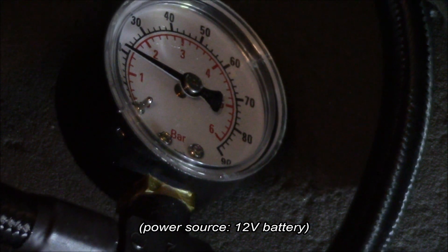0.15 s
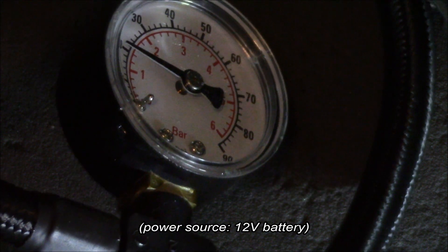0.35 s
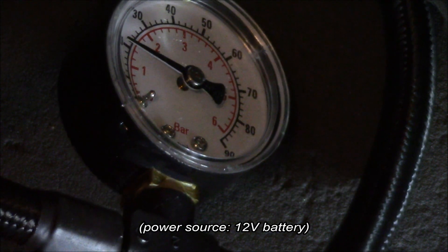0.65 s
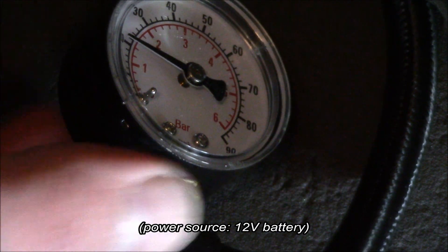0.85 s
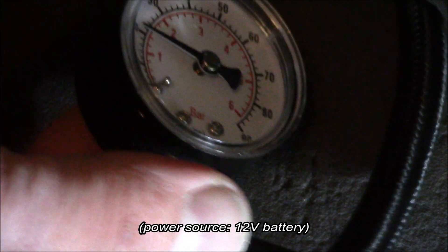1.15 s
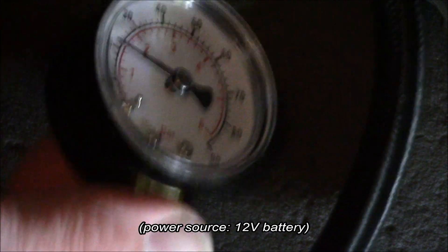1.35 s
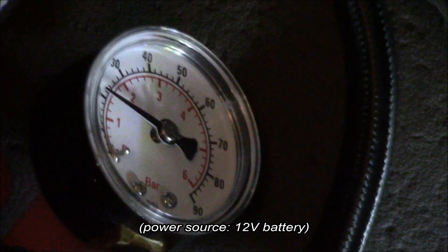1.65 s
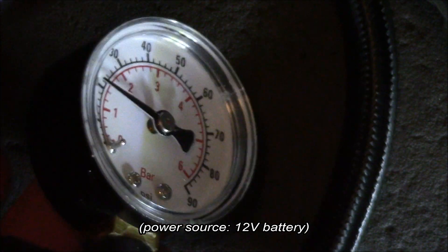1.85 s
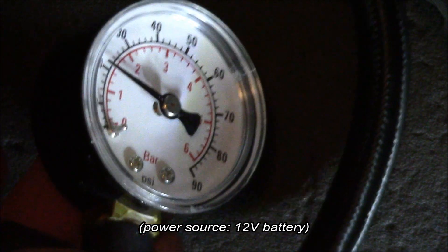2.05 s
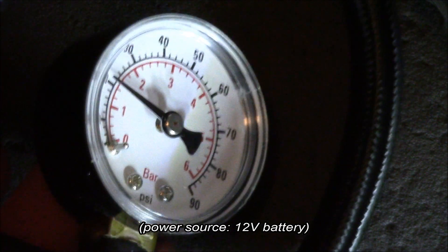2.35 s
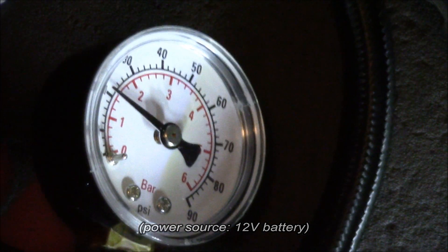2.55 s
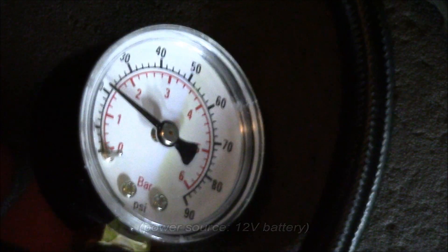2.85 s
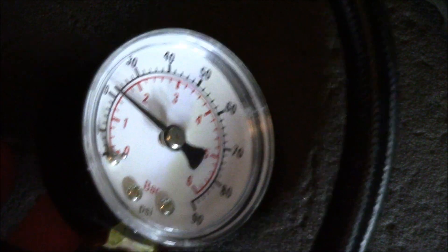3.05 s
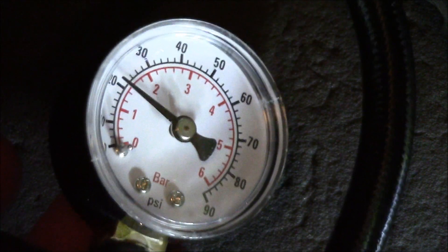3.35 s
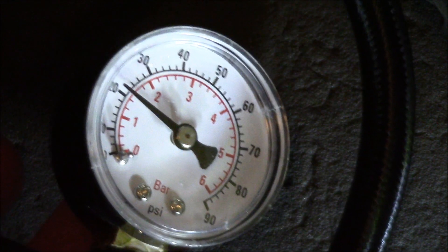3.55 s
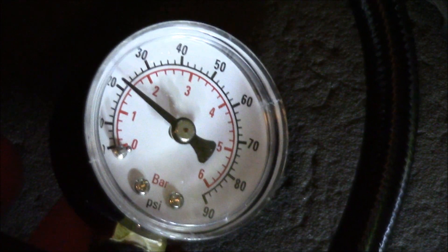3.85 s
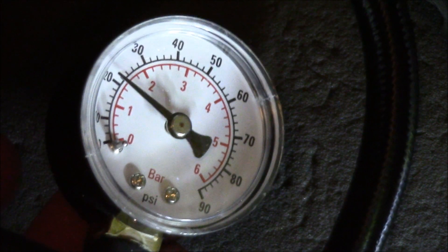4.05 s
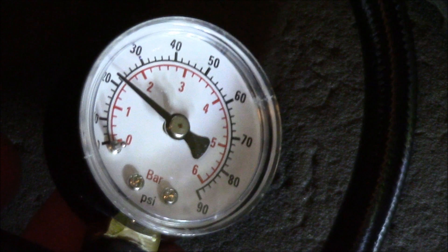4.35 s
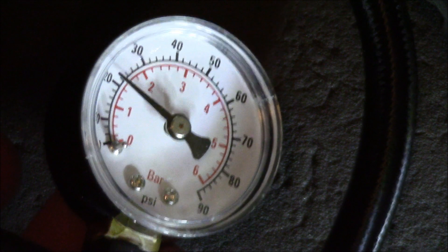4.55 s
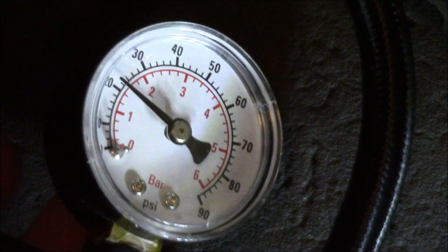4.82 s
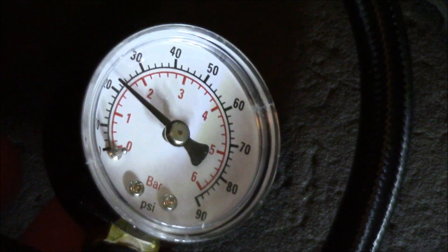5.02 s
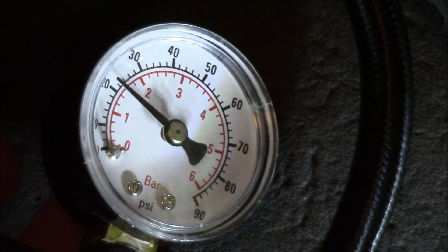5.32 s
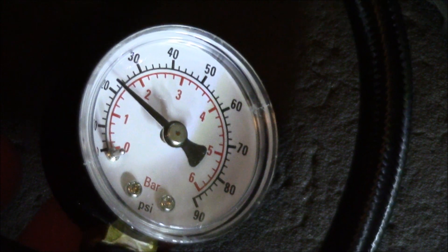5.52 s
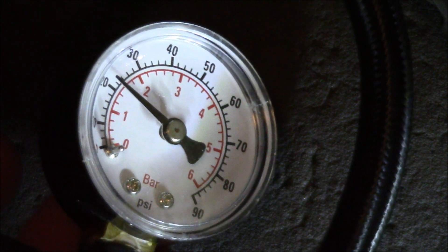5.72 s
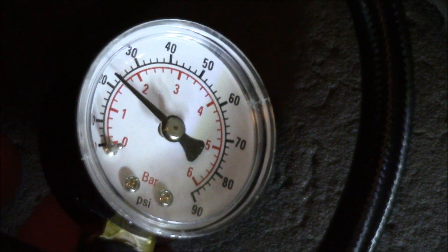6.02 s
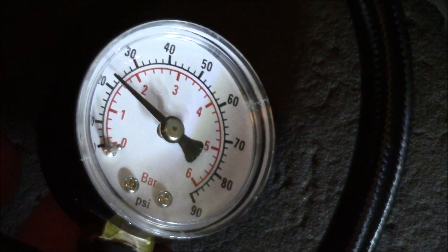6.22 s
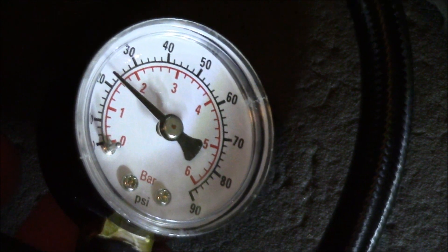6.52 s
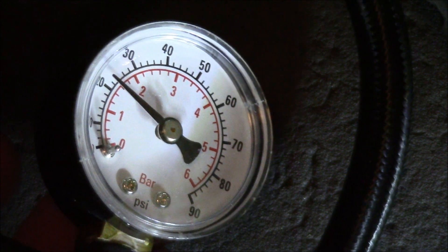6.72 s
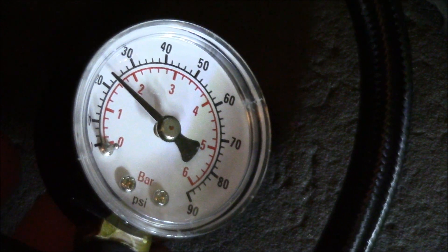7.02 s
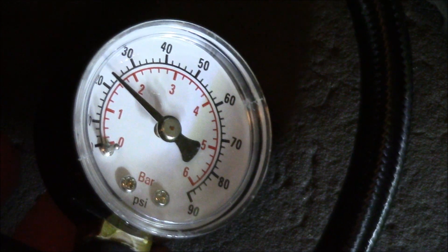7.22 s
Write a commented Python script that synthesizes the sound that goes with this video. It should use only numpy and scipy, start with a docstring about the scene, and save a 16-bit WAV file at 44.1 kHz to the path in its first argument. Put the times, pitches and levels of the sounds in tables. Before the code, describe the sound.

A small electric tyre compressor is already running very close to the microphone in a garage. Its rapid slapping buzz carries hard housing knocks, rattling, pulsing air hiss and a high gear whine. It rocks loosely at first, then settles firmer and more even about halfway through. The pitch sags only slightly as pressure builds. The sound is dry, nearly mono, and continues to the end.

```python
"""A rapid, slapping buzz with knocks, hiss and gear whine: a small geared tyre compressor close by in a garage.
It slows a little as the pressure builds. Each crank turn slaps and knocks the housing (partials and struck modes)
and puffs air past the valve (gated noise); gear teeth whine through shell modes, and the motor's own turn
beats against the crank. The housing rocks loosely, then settles on the floor. The sound is nearly mono."""
import sys
import numpy as np
from scipy import signal
from scipy.fft import rfft, irfft, next_fast_len
from scipy.io import wavfile
from scipy.ndimage import uniform_filter1d

SR = 44100
rng = np.random.default_rng(int(sys.argv[2]) if len(sys.argv) > 2 else 0)


def dump(signal):
    """Clip the signal to [-1, 1] and save it as 16-bit WAV at the path in sys.argv[1]."""
    limited = np.clip(np.atleast_2d(signal).T, -1, 1)
    pcm = np.round(limited * 32767).astype(np.int16)
    wavfile.write(sys.argv[1], SR, pcm)


N = 325458  # samples
GEAR, PINION = 52, 11  # teeth on the crank gear and on the motor's pinion


def undb(db):
    """Decibel law: the amplitude gain of a dB value."""
    return 10 ** (np.asarray(db) / 20)


def level(x, db):
    """Mean-square energy: scales a signal to an rms level in dB re 1."""
    return x * undb(db) / np.sqrt(np.mean(x ** 2))


def curve(table, column):
    """Linear interpolation: a table column at every sample, with time in the first column."""
    rows = np.array(table, float)
    return np.interp(np.arange(N) / SR, rows[:, 0], rows[:, column])


def change(at_s, time_s):
    """Logistic transition: a smooth step from 0 to 1 about a moment."""
    return .5 + .5 * np.tanh((np.arange(N) / SR - at_s) / (2 * time_s))


def walk(rate):
    """Slow random modulation: levels held for 1 / rate s and slewed twice, with a spread near 1."""
    hold = int(SR / rate)
    steps = np.repeat(rng.standard_normal(N // hold + 1), hold)
    return 1.16 * uniform_filter1d(uniform_filter1d(steps, hold), hold)[:N]


def colour(x, points, peaks=()):
    """Spectral shaping: filters by (Hz, dB) points, adding the power of (Hz, width Hz, dB) resonances."""
    size = next_fast_len(N)
    hz = np.maximum(np.arange(size // 2 + 1) * SR / size, 1)
    rows = np.array(points, float)
    power = undb(2 * np.interp(np.log(hz), np.log(rows[:, 0]), rows[:, 1], left=-90))
    for centre_hz, width_hz, db in peaks:
        power = power + undb(2 * db) / (1 + (2 * (hz - centre_hz) / width_hz) ** 2) ** 2
    return irfft(rfft(x, size) * np.sqrt(power), size)[:N]


def ring(x, hz, width_hz):
    """Damped resonance: one mode that decays faster the wider its bandwidth."""
    pole = np.exp((2j * np.pi * hz - np.pi * width_hz) / SR)
    return signal.lfilter([1], [1, -pole], x).imag


def swell(crank, angle, depth_db):
    """Periodic modulation: a gain that peaks once a turn at a crank angle."""
    return undb(depth_db * np.cos(2 * np.pi * (crank - angle)))


def puff(crank, angle, rise, fall):
    """Exponential attack and decay: a gain that rises at a crank angle; rise and fall in turns."""
    since = (crank - angle) % 1
    return (1 - np.exp(-since / rise)) * np.exp(-since / fall)


def each_turn(crank, angle, scatter_db):
    """Cycle-to-cycle variation: a new random gain for every turn, eased over a millisecond."""
    turn = (crank + 1 - angle % 1).astype(int)
    gain_db = scatter_db * rng.standard_normal(turn[-1] + 1)[turn]
    return undb(uniform_filter1d(gain_db, SR // 1000))


def worn(crank, depth_db, count=28):
    """Synchronous modulation by uneven teeth: a random gain pattern that repeats in every turn."""
    pattern = rng.standard_normal(count)
    return undb(depth_db * np.interp(crank % 1, np.arange(count) / count, pattern, period=1))


START_TURNS = .938  # crank angle at the start
# Crank speed, easing as the pressure builds. Each row: time in seconds, speed in Hz.
CRANK_SPEED = [(0, 54.25), (.15, 54.324), (1.15, 54.371), (1.3, 53.661), (1.7, 54.198), (2.4, 53.396),
               (2.9, 53.116), (3.05, 53.195), (4.05, 52.859), (4.2, 52.557), (5, 52.742), (5.15, 52.494),
               (6.55, 52.412), (6.7, 52.629), (6.85, 52.23), (7.38, 52.2)]


def crank_angle():
    """Phase is the integral of frequency: the crank angle in turns at every sample."""
    return START_TURNS + np.cumsum(curve(CRANK_SPEED, 1)) / SR


LOOSE_START, LOOSE_EASE_PER_S, LOOSE_END = 0.91, .1, 0.11  # shares 0-1, and easing per second
SETTLES_S, SETTLE_TIME_S = 3.38, 0.087


def rocking_share():
    """Contact stiffening: the housing rocks a little less and less, then settles on the floor."""
    rocking = LOOSE_START - LOOSE_EASE_PER_S * np.arange(N) / SR
    return np.clip(rocking + (LOOSE_END - rocking) * change(SETTLES_S, SETTLE_TIME_S), 0, 1)


EARLY_START_DB, EARLY_END_DB, FADES_AT_S, FADE_TIME_S = -10, -18.5, 2.6, 0.73


def early_colour_gain():
    """Logistic fade: a bright early colour in the hiss and whine overtones fades after the first seconds."""
    return undb(EARLY_START_DB + (EARLY_END_DB - EARLY_START_DB) * change(FADES_AT_S, FADE_TIME_S))


# Partials of the stroke with the housing rocking loosely and sitting firmly.
# Each row: multiple of crank speed, relative level in dB.
LOOSE_PARTIALS = [(1, -37), (2, -19), (3, -21), (4, -20.5), (5, -18), (6, -11.5), (7, -8), (8, -6.5),
                  (9, -2.5), (10, -2), (11, -0.5), (12, 0.5), (13, 4.5), (14, -5.5), (15, -2), (16, -5.5),
                  (17, -14), (18, -13), (19, -6.5), (20, -20), (21, -7.5), (22, -7), (23, -53), (24, -49),
                  (25, -47), (26, -26), (27, -38), (28, -47), (29, -16), (30, -10)]
FIRM_PARTIALS = [(1, -36), (2, -22), (3, -27.5), (4, -25), (5, -15), (6, -12.5), (7, -55), (8, -17.5),
                 (9, -4), (10, 1), (11, 2), (12, -3.5), (13, -5.5), (14, -10), (15, -4.5), (16, -10.5),
                 (17, -9), (18, -21), (19, 0), (20, -11), (21, -7), (22, -17.5), (23, -8), (24, -43),
                 (25, -16), (26, -6), (27, -14), (28, -9), (29, -31), (30, -9.5)]


def stroke(crank, loose):
    """Fourier series with group delay: a slap whose partials near two housing resonances arrive late."""
    orders = np.array(LOOSE_PARTIALS)[:, 0]
    # delay in turns against order, summed to a phase lag in cycles
    delay = .065 + sum(.45 * np.exp(-((orders - k) / 1.25) ** 2) for k in (12.6, 20.4))
    lag = np.cumsum(delay)
    # the motor's unbalance meets each slap at a new angle, so the slaps beat
    beat = loose * np.sin(2 * np.pi * (5 - GEAR / PINION) * crank)
    out = 0
    for (k, loose_db), (_, firm_db), late in zip(LOOSE_PARTIALS, FIRM_PARTIALS, lag):
        rocked = min(k / 7.3, 1) ** 2  # the lowest partials vary least
        wander_db = rocked * ((0.35 + 0.92 * loose) * walk(12) + 0.44 * beat)
        db = firm_db + (loose_db - firm_db) * loose + wander_db
        wander = rocked * (0.17 * beat + (0.0089 + 0.031 * loose) * walk(12))  # cycles
        out = out - undb(db) * np.cos(2 * np.pi * (k * crank - late + wander))
    return out


# Lines of the motor. Each row: multiple of motor speed, relative level in dB,
# level of each crank-rate sideband in dB against its line.
MOTOR_LINES = [(1, -20, -20), (3, -5.5, -33), (4, -31, 17)]


def motor(crank):
    """Amplitude modulation: motor lines gain sidebands as the load swings once a crank turn."""
    load = np.cos(2 * np.pi * crank)
    motor_turns = crank * GEAR / PINION
    out = 0
    for k, db, band_db in MOTOR_LINES:
        swing = 1 + 2 * undb(band_db) * load
        out = out + undb(db + 1.4 * walk(7.9)) * swing * np.sin(2 * np.pi * k * motor_turns)
    return out


KNOCK_ANGLE, KNOCK_SCATTER_DB, KNOCK_JITTER_MS = 0.2623, 1.5, .3  # angle in turns
# Low modes of the housing. Each row: frequency in Hz, width in Hz, relative level in dB.
HOUSING_MODES = [(478, 123, -5.5), (568, 140, -5), (685, 82, 1.5), (775.4, 45, -2), (1030, 86, -19),
                 (1190, 58, -16), (1430, 140, -15), (1716, 57, -4.5)]


def knocks(crank, loose):
    """Modal excitation: a loose part strikes once a turn at varying spots, so the modes share it anew."""
    turns = np.arange(int(crank[-1]))
    chance = rng.standard_normal((len(turns), len(HOUSING_MODES) + 2))
    at = np.interp(turns + KNOCK_ANGLE, crank, np.arange(N)) + KNOCK_JITTER_MS * chance[:, 0] * SR / 1000
    at = np.clip(at, 0, N - 1).astype(int)
    size = undb(KNOCK_SCATTER_DB * chance[:, 1] + 3.6 * loose[at])
    out = 0
    for k, (hz, width_hz, db) in enumerate(HOUSING_MODES):
        blows = np.zeros(N)
        blows[at] = size * undb(db) * np.tanh(3.3 * chance[:, k + 2])  # sign and share of this mode
        softened = ring(blows, hz, width_hz)
        out = out + ring(softened, hz, 3.3 * width_hz) * width_hz
    high_pass = signal.butter(4, 330, "high", fs=SR, output="sos")
    return level(signal.sosfilt(high_pass, out), -12.0)


# Spectra of the thudding loose parts and of the casing's finer chatter.
# Each row: frequency in Hz, relative spectral level in dB.
THUD_SPECTRUM = [(40, -48), (150, -43), (300, -19.5), (420, -16), (560, -3), (690, 7), (800, -6.5),
                 (950, -33)]
CHATTER_SPECTRUM = [(60, -45), (300, -22.5), (700, -5), (1000, -2.5), (1250, -1.5), (1500, 1.5),
                    (1900, -9.5), (2200, -5), (2500, -33)]


def rattle(crank):
    """Modulated noise: small parts thud in a burst after the slap; the casing chatters more evenly."""
    burst = swell(crank, .38, 11) * each_turn(crank, .9, 1.5)
    chatter = (.5 + puff(crank, 0.078, 0.023, 0.57)) * each_turn(crank, 0.039, 1.55) * worn(crank, 0.7)
    thuds = level(colour(burst * rng.standard_normal(N), THUD_SPECTRUM), -7.5)
    return thuds + level(colour(chatter * rng.standard_normal(N), CHATTER_SPECTRUM), -9.5)


# Shell modes under the gears. Each row: frequency in Hz, width in Hz, relative level in dB.
GEAR_MODES = [(2765, 210, -2), (2612, 70, -6), (3000, 400, -9)]
# Overtones of the teeth. Each row: multiple of the tooth rate, mode frequency in Hz, mode width in Hz,
# relative level in dB, level change in dB, and times in seconds of two level steps,
# one adding the change and one removing it.
TOOTH_OVERTONES = [(2, 5530, 300, -10, -1, 0.97, 0.9), (4, 11050, 370, -9, 8, 0.05, 0.66)]
# Gain of the gear whine. Each row: time in seconds, gain in dB.
WHINE_GAIN = [(0, -3.5), (.5, -0.5), (1.1, 2.5), (2.5, -1.1), (3.5, 0.3), (4.2, -2), (7.38, -2)]


def whine(crank, early):
    """Gear-mesh excitation: tooth contacts, bent in pitch as compression brakes the crank, drive shell modes."""
    teeth = GEAR * crank + 0.61 * np.sin(2 * np.pi * (crank - .62)) + 0.2 * walk(25)
    load = (0.043 + puff(crank, 0.69, .1, 0.087)) * each_turn(crank, .64, 0.49)

    def steep(multiple, hz, width_hz, db):
        """Cascaded resonance: a mode applied twice, for dark skirts."""
        contact = load * np.sin(2 * np.pi * multiple * teeth)
        return undb(db) * width_hz ** 2 * ring(ring(contact, hz, width_hz), hz, width_hz)

    # the overtones fade with the bright early colour
    overtones = 0
    for *mode, change_db, first_step_s, second_step_s in TOOTH_OVERTONES:
        steps = change(first_step_s, .08) - change(second_step_s, 0.091)
        overtones = overtones + steep(*mode) * undb(change_db * steps)
    main = level(sum(steep(0.99, *mode) for mode in GEAR_MODES), -10.0)  # the main whine, about the tooth rate
    return (main + early * level(overtones, -5)) * undb(curve(WHINE_GAIN, 1))


def air(crank, points, peaks):
    """Turbulent noise: a long puff on the pressure stroke, a short one at the valve; treble pumps deeper."""
    puffs = 0.36 + puff(crank, 0.64, 0.23, 0.27) + 0.5 * puff(crank, 0.15, 0.02, 0.1)
    gate = puffs * each_turn(crank, 0.57, 0.57) * worn(crank, 0.56)
    grain = undb(0.91 * np.minimum(rng.exponential(size=N), 5)) * rng.standard_normal(N)
    low, high = (level(colour(gate ** depth * grain, points, peaks), 0) for depth in (.9, 1.5))
    low_pass, high_pass = (signal.butter(2, 6800, kind, fs=SR, output="sos") for kind in ("low", "high"))
    return signal.sosfiltfilt(low_pass, low) + signal.sosfiltfilt(high_pass, high)


# Air past the valve. Each row: frequency in Hz, relative spectral level in dB.
AIR_SPECTRUM = [(900, 6.5), (1800, -8), (2200, -4.5), (2450, -9), (2950, -1), (3250, -5), (4000, -4.5),
                (5000, -7), (7000, -14.5), (9500, -9), (12700, -12.5), (13800, -18), (14800, -35),
                (15600, -36)]
# Shell resonances the air excites. Each row: frequency in Hz, width in Hz, relative level in dB.
SHELL_MODES = [(2177, 510, 0), (3427, 134, 0), (3806, 270, 1.5), (4150, 89, 2), (5064, 560, -3.5),
               (5450, 83, -6), (8150, 1010, -6), (9540, 120, -9), (10430, 480, -3.5), (11150, 140, -6),
               (12080, 350, -4)]


def valve_hiss(crank):
    """Flow-excited resonance: air past the valve makes the shell hiss."""
    return air(crank, AIR_SPECTRUM, SHELL_MODES) * undb(-6.5)


# Resonances of the bright early colour of the hiss. # Each row: frequency in Hz, width in Hz, relative level in
# dB.
EARLY_MODES = [(5500, 400, -25), (6900, 1800, 0), (11700, 600, -8)]


def early_hiss(crank, early):
    """Resonant noise: a brighter hiss through its own resonances, fading after the first seconds."""
    faint_floor = [(4000, -40), (12000, -40), (15000, -70)]
    return early * undb(-10.5) * air(crank, faint_floor, EARLY_MODES)


# Filter for the difference of the two channels. Each row: frequency in Hz, gain in dB.
SIDE_GAIN = [(60, -40), (300, -13.5), (500, -8.5), (750, -57), (1200, -18.5), (2500, -18), (5000, -22.5),
             (10000, -12), (14000, -25)]


def side_sound(crank, hiss):
    """Partial decorrelation: a separate rattle and hiss, filtered, set the two microphone ports apart."""
    return colour(undb(-7.0) * rattle(crank) + hiss, SIDE_GAIN)


# Overall gain. Each row: time in seconds, gain in dB.
OVERALL_GAIN = [(0, -17.5), (1, -19), (2, -19.5), (3.5, -20), (4.1, -19), (4.8, -18.5), (5.5, -18.5),
                (7.38, -18)]


def scene():
    """Superposition: parts that follow one crank angle add up, with a small left-right difference."""
    crank, loose, early = crank_angle(), rocking_share(), early_colour_gain()
    hiss, hiss_side = valve_hiss(crank), valve_hiss(crank)
    near_hiss = early_hiss(crank, early)
    lines = undb(-9) * (stroke(crank, loose) + motor(crank))
    mid = lines + knocks(crank, loose) + rattle(crank) + whine(crank, early) + hiss + near_hiss
    side = side_sound(crank, hiss_side)
    return undb(curve(OVERALL_GAIN, 1)) * np.array([mid + side, mid - side])


def record(dry):
    """Soft saturation and band limiting: the loudest peaks are rounded and the top is cut at 15650 Hz."""
    low_pass = signal.ellip(12, .3, 80, 15650, fs=SR, output="sos")
    return signal.sosfilt(low_pass, np.tanh(1.5 * dry) / 1.5)


dry = scene()
out = record(dry)
dump(out)
```